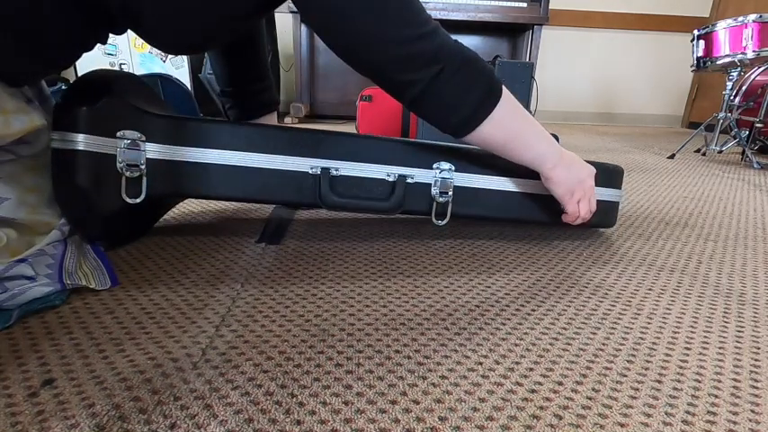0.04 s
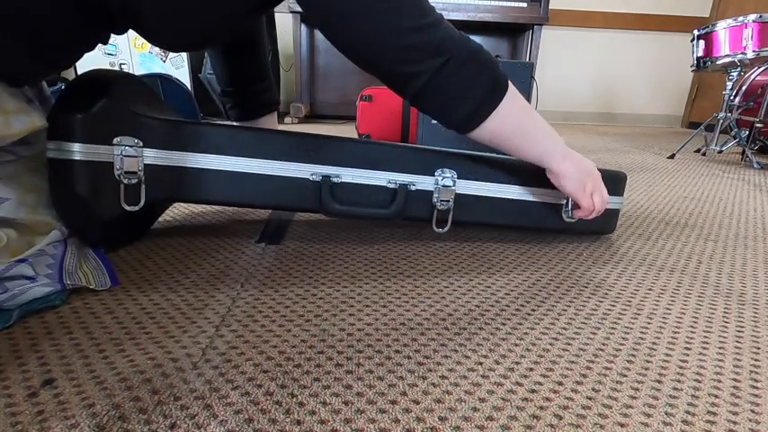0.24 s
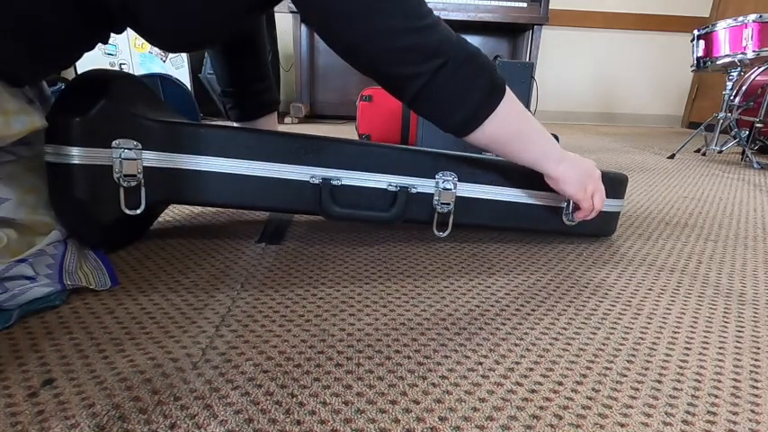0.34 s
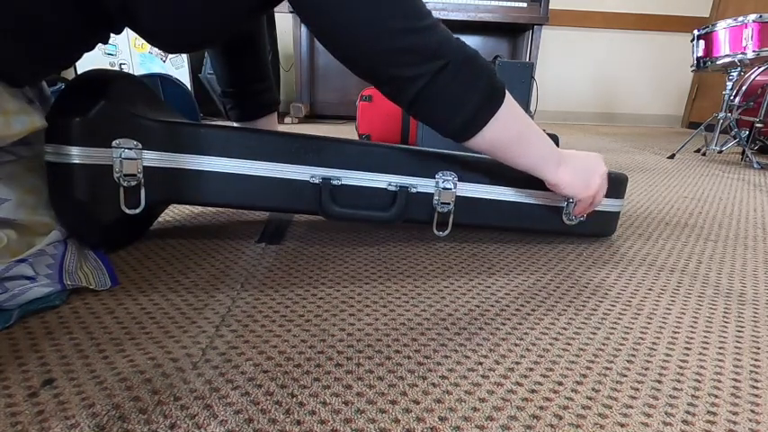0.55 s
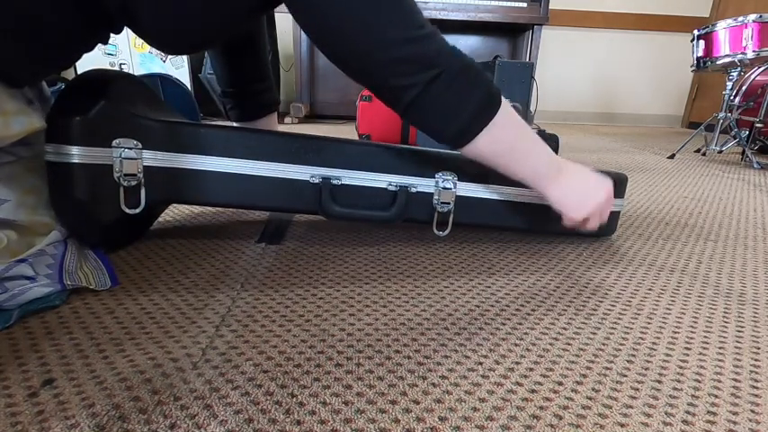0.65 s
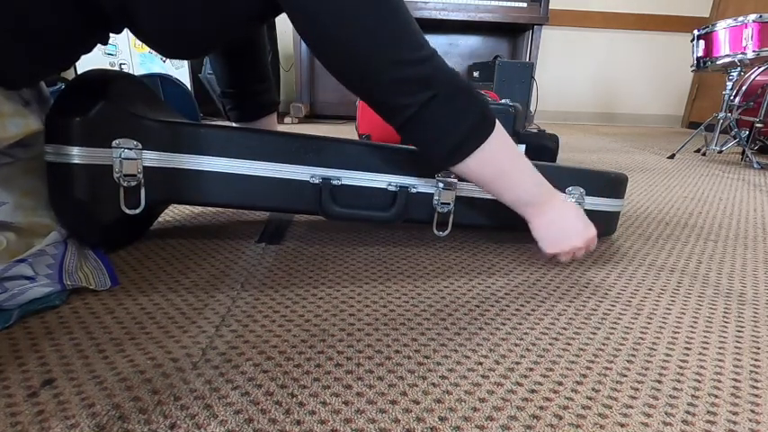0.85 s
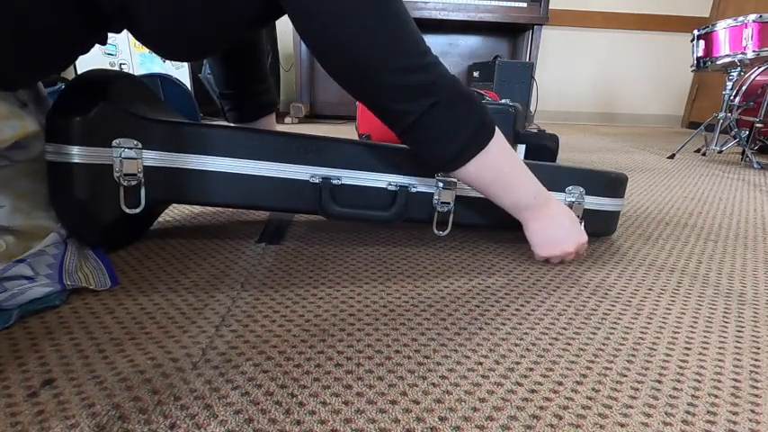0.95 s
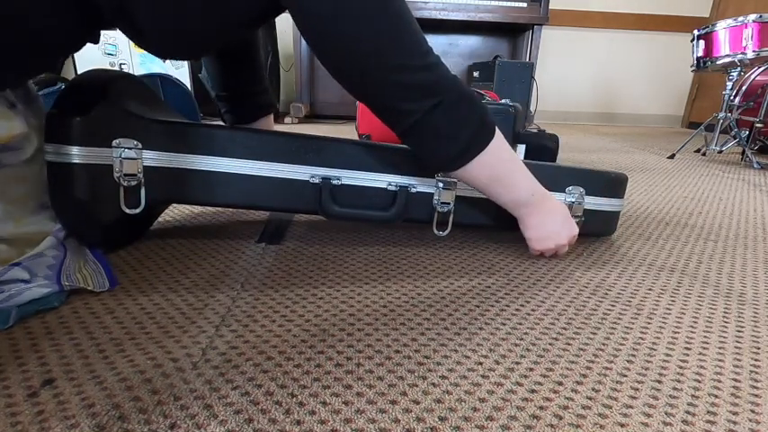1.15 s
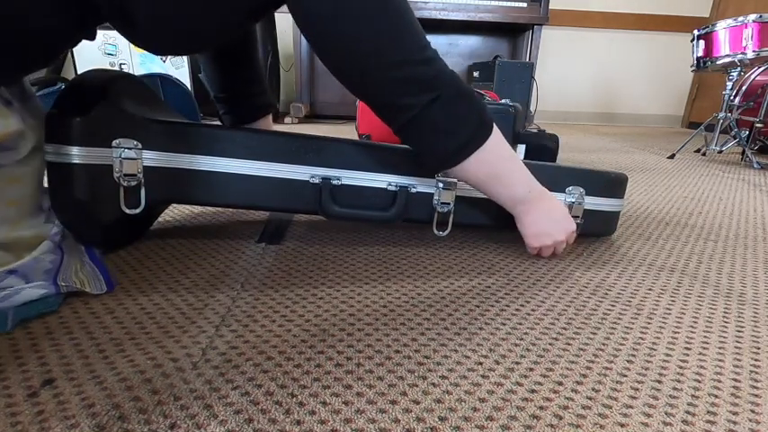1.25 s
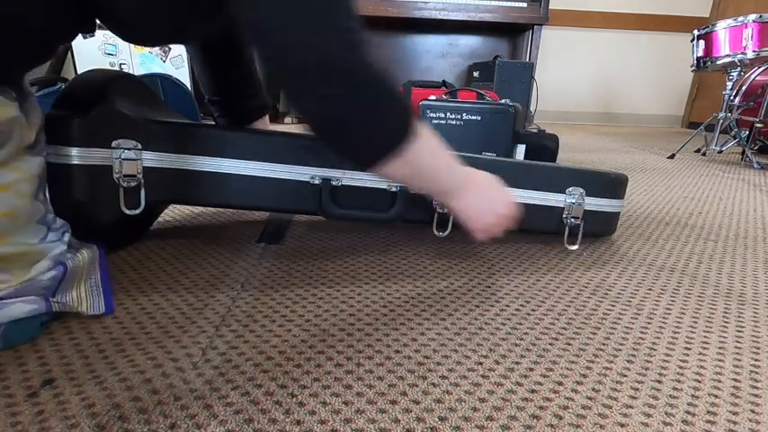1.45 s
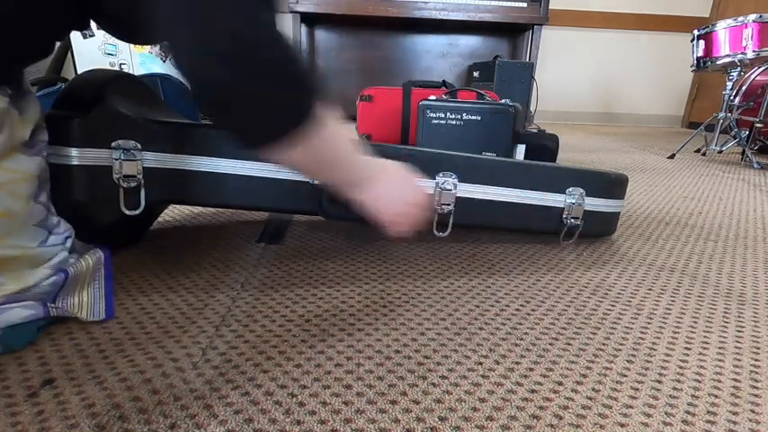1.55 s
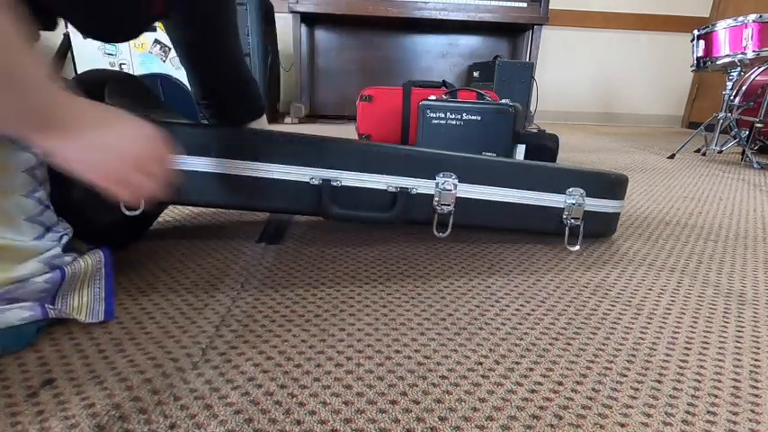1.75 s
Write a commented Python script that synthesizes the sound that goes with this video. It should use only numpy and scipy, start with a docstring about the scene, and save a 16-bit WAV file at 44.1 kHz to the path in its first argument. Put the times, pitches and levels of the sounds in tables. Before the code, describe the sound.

Close, slightly right of centre, a case latch pops with a boomy knock, small rattles follow, then a second, brighter and thinner snap and clack; soft sleeve rustle ends it, over low engine-like drone indoors.

```python
"""Latches of a hard case

A hand snaps open two metal latches of a long hard case that lies on the carpet of a small room.
Each contact excites damped modes of plastic shell, latch metal and hollow case, plus bursts of noise;
a weaker noise tail is the rattle of the loose hasps. A diffuse room tail follows.
Coloured noise gives the room tone and, late, a sleeve that brushes along as the arm moves.
Wavering harmonic and inharmonic sines form a low drone, like an engine outside, that slowly rises in pitch."""
import sys
import numpy as np
from scipy import signal
from scipy.fft import rfft, irfft
from scipy.io import wavfile
from scipy.ndimage import uniform_filter1d

SR = 44100
rng = np.random.default_rng(int(sys.argv[2]) if len(sys.argv) > 2 else 0)


def output_pcm(signal):
    """Save a mono or channel-first signal as 16-bit PCM at the path in sys.argv[1].

    Samples are clipped to [-1, 1] before scaling.
    """
    pcm = np.clip(np.atleast_2d(signal).T, -1, 1) * 32767
    wavfile.write(sys.argv[1], SR, np.round(pcm).astype(np.int16))


N = 79380
T = np.arange(N) / SR

# spectral shape of the room tone: [f/Hz, relative density/dB]
AIR_SPECTRUM = [(15, -38), (30, -10.5), (55, -4), (90, 4.5), (140, -14), (240, -13.5), (330, -23.5),
                (520, -38), (1000, -41.5), (1600, -44.5), (3900, -55.5), (6900, -55.5), (10300, -69.5),
                (15000, -70)]
# course of the drone: [t/s, fundamental f/Hz, level/dB]
DRONE_COURSE = [(0, 71.4, -34), (.06, 76.44, -41.5), (.13, 76.7, -41), (.22, 74.94, -43), (.35, 78.21, -52),
                (.44, 78, -33), (.53, 79.22, -47.5), (.67, 77.85, -35.5), (.76, 78.82, -35),
                (.85, 79.12, -42), (.9, 80.83, -61), (1.0, 79, -43.5), (1.13, 79.54, -32), (1.3, 80, -33.5),
                (1.49, 83.03, -33.5), (1.54, 83.77, -46.5), (1.62, 82.8, -30), (1.69, 84.5, -46),
                (1.8, 85.5, -49.5)]
# overtones of the drone: [multiple of the fundamental, level/dB relative to it]
DRONE_OVERTONES = [(2, -21.5), (3, -26)]
# level of a second, higher set of lines that swells late: [t/s, level/dB]
SWELL_COURSE = [(0, -47.5), (1.2, -57.5), (1.42, -43.5), (1.64, -43), (1.8, -51.5)]
# lines of that set: [multiple of the fundamental, level/dB relative to the swell]
SWELL_PARTIALS = [(1.4, -4.5), (2, -5), (2.53, -9.5)]
# course of the sleeve: [t/s, level/dB]
SLEEVE_COURSE = [(0, -110), (.9, -100), (1.12, -76.5), (1.25, -64), (1.38, -56.5), (1.5, -53), (1.64, -54),
                 (1.8, -56)]
# spectral shape of the rubbing cloth: [f/Hz, relative density/dB]
CLOTH_SPECTRUM = [(200, 7), (700, -4), (1600, 2.5), (2800, -2), (4500, -2.5), (8000, -11.5), (11000, -23.5),
                  (15000, -35)]
# bands of the diffuse room tail: [centre f/Hz, level/dB, reverberation time t60/s]
ROOM_BANDS = [(99.7, -14.5, 0.44), (320, -3.5, 0.3), (800, -10, 0.28), (1590, -10.5, 0.31),
              (3500, -9, 0.28), (7000, -12.5, 0.21), (14000, -10.5, 0.31)]
# right-to-left level difference of the case: [f/Hz, level/dB]
RIGHT_EXCESS = [(200, 0.4), (700, -0.5), (1300, 2), (2400, -0.3), (4400, 0.3), (8000, 2.5), (15000, 3.5)]
# air modes of the hollow case: [f/Hz, mean level/dB, t60/s], scattered at each contact
HOLLOW_MODES = [(76, -9.5, 0.21), (118.6, -4, 0.12), (165.2, -3, 0.097), (199.3, -5, .08),
                (237.8, -3, 0.075), (318.4, -8, 0.092), (469, -10.5, 0.047)]
# modes of the plastic shell: [f/Hz, mean level/dB, t60/s], scattered and favoured at each contact
SHELL_MODES = [(568, -3.5, 0.043), (711, -1, 0.052), (809, -5, 0.05), (995, -5, .035), (1224, -4.5, 0.051),
               (1488, -1.5, 0.019), (1656, -12.5, 0.019), (1940, -12.5, .02)]
# modes of the latch metal: [f/Hz, mean level/dB, t60/s], scattered at each contact
METAL_MODES = [(2250, 5, 0.021), (2735, 8, 0.018), (3096, 0, 0.022), (3304, -1, 0.065), (3730, -0.5, 0.036),
               (4202, 2.5, 0.02), (4580, -3, 0.041), (5490, -5.5, 0.02), (6660, -4.5, .02),
               (8570, -13.5, 0.06)]
# spectral shape of the noise of the shell, before a struck spot favours it: [f/Hz, relative density/dB]
KNOCK_SPECTRUM = [(200, -19), (450, -1.5), (720, 1), (1000, -1), (1300, 0), (1650, -4.5), (2100, -11.5),
                  (3000, -20), (8000, -51)]
# spectral shape of the noise of the latch metal: [f/Hz, relative density/dB]
CLICK_SPECTRUM = [(900, -13), (2000, -5), (3000, 2.5), (4500, -2.5), (6500, -8.5), (9500, -15.5),
                  (12000, -28), (16000, -37)]
# contacts of latch and case: [t/s, shell level/dB, metal level/dB, hollow level/dB,
# scrape decay constant/ms, f/Hz favoured by the struck spot]; the gains below add to the levels
CONTACT_EVENTS = [(0.226, -33, -49, -43, 12, 810), (0.2351, -18, -28, -11.5, 2, 926),
                  (0.2406, -12, -23.5, -14.5, 1.44, 1340), (0.262, -30.5, -36, -22.5, 10, 1500),
                  (0.283, -35, -48, -22, 16, 1810), (0.297, -32.5, -42, -32, 4.3, 910),
                  (0.315, -28.5, -53.5, -33, 7.5, 706), (0.3923, -32, -51.5, -58, 1.7, 735),
                  (0.5004, -33.5, -46.5, -40.5, 1.52, 1310), (0.542, -32.5, -52.5, -45.5, 4.2, 1300),
                  (0.5594, -32.5, -45, -47.5, 3.3, 807), (0.565, -40, -50, -54.5, 1.5, 1230),
                  (0.6071, -32.5, -51, -43.5, 7.5, 700), (0.641, -43, -76, -44.5, 3.6, 1080),
                  (0.711, -46, -82, -42, 10, 1135), (0.7802, -36.5, -65, -32.5, 4, 480),
                  (0.8128, -33, -55.5, -45.5, 2.3, 750), (0.826, -52, -74, -59, 5.5, 610),
                  (0.842, -41.5, -81, -40, 2.7, 603), (1.0505, -55.5, -71.5, -69, 0.81, 1960),
                  (1.182, -52, -72, -64, 2.3, 1200), (1.2247, -26.5, -40, -32.5, 2.5, 1200),
                  (1.2614, -13.5, -22.5, -33, 1.25, 1733), (1.377, -52, -65, -38.5, 2.16, 1400),
                  (1.3873, -24, -28, -28, 1.6, 1020), (1.3926, -26.5, -51.5, -39.5, 5.2, 980),
                  (1.418, -33.5, -45, -30, 6.45, 1190)]

AIR_DB = -46
ROOM_GAP_S, ROOM_WIDE_HZ = 0.0054, 2200
PORT_LAG_S = 0.000042
# gains of the ringing and noisy parts of each contact
SHELL_DB, KNOCK_DB, METAL_DB, CLICK_DB, HOLLOW_DB = -9, -7, -3.5, -4, -1
CHATTER_DB, CHATTER_S = -9.5, 0.009  # brief rattle of the loose hasps
PEAK_S, RING_S = 0.003, 0.4  # averaging window for peak level, length of a contact
SPOT_DB, SPOT_OCTAVES = 9, 0.59  # height and width of the favoured band
RISE_SHARE = 0.2  # rise constant as a share of the decay constant
CLICK_WIDTH, KNOCK_WIDTH = 0.55, 0.22  # side-to-mid amplitude ratios
TOP_HZ = 15700


def undb(db):
    """A level in decibels is 20 times the logarithm of an amplitude ratio; return the ratio."""
    return 10 ** (np.asarray(db) / 20)


def curve(rows, column=1):
    """Linear interpolation: a table column becomes a continuous function of time."""
    rows = np.array(rows)
    return np.interp(T, rows[:, 0], rows[:, column])


def unit(x):
    """Normalisation of mean power: the rms becomes 1."""
    return x / np.sqrt(np.mean(x ** 2))


def unit_peak(x):
    """Normalisation of short-time power: the loudest few milliseconds get rms 1."""
    power = uniform_filter1d(x ** 2, int(PEAK_S * SR), mode="constant")
    return x / np.sqrt(power.max())


def colour(x, points):
    """Minimum-phase filtering: folding the cepstrum of a magnitude outline makes its response causal."""
    n, points = len(x), np.array(points)
    hz = np.maximum(np.fft.rfftfreq(n, 1 / SR), 1)
    outline_db = np.interp(np.log(hz), np.log(points[:, 0]), points[:, 1])
    cepstrum = irfft(np.log(undb(outline_db)), n)
    cepstrum[1:n // 2] *= 2
    cepstrum[n // 2 + 1:] = 0
    return irfft(rfft(x) * np.exp(rfft(cepstrum)), n)


def wide_noise(n, wide_hz):
    """Diffuse-field coherence: both sides agree in the bass and become unrelated in the treble."""
    hz = np.fft.rfftfreq(n, 1 / SR)
    mid, side = rfft(rng.standard_normal((2, n)))
    width = hz / np.hypot(hz, wide_hz)
    sides = mid + np.array([[1], [-1]]) * width * side
    return irfft(sides / np.sqrt(1 + width ** 2), n)


def hiss(points, wide_hz):
    """Broadband random pressure: stereo noise with a given spectral shape and rms 1."""
    return unit(np.array([colour(side, points) for side in wide_noise(N, wide_hz)]))


def waver(rate_hz, depth):
    """Random amplitude modulation: noise smoothed twice makes a gain that wanders around 1."""
    k = int(SR / rate_hz)
    smooth = uniform_filter1d(uniform_filter1d(rng.standard_normal(N), k), k)
    return 1 + depth * unit(smooth)


def room_tone():
    """Stationary background noise: steady random pressure, strongest in the bass."""
    return undb(AIR_DB) * hiss(AIR_SPECTRUM, wide_hz=1500)


def wavering_lines(rows, phase):
    """Superposition of sines tied to one phase, each with its own random amplitude modulation."""
    total = 0
    for multiple, db in rows:
        total = total + undb(db) * np.sin(multiple * phase) * waver(rate_hz=7.8, depth=0.51)
    return total


def drone():
    """Engine-like line spectrum: all lines follow one moving fundamental, the higher set swelling late."""
    phase = 2 * np.pi * np.cumsum(curve(DRONE_COURSE)) / SR
    main = np.sin(phase) * waver(rate_hz=9.6, depth=0.05)
    main = main + wavering_lines(DRONE_OVERTONES, phase)
    swell = wavering_lines(SWELL_PARTIALS, phase)
    # sqrt(2) makes the rms of a sine 1
    return np.sqrt(2) * (undb(curve(DRONE_COURSE, 2)) * main + undb(curve(SWELL_COURSE)) * swell)


def sleeve():
    """Friction noise: cloth slides softly as the arm swings back, heard as modulated coloured noise."""
    cloth = hiss(CLOTH_SPECTRUM, wide_hz=2000)
    return cloth * undb(curve(SLEEVE_COURSE)) * waver(rate_hz=68, depth=0.061)


def room(x):
    """Diffuse reverberation: convolution with noise that decays exponentially at each band's own rate."""
    t = T[:SR // 2]
    hz, db, t60 = np.array(ROOM_BANDS).T
    noise = rfft(wide_noise(len(t), ROOM_WIDE_HZ))
    log_hz = np.log(np.maximum(np.fft.rfftfreq(len(t), 1 / SR), 1))
    onset = np.clip(t / ROOM_GAP_S - 1, 0, 1)  # silent for one gap, full after two
    tail = 0
    for share, band_db, band_t60 in zip(np.eye(len(hz)), db, t60):
        fade = np.exp(-np.log(1000) * t / band_t60) * onset
        band = irfft(noise * np.interp(log_hz, np.log(hz), share), len(t))
        tail = tail + undb(band_db) * band * fade / np.linalg.norm(fade)
    return signal.fftconvolve(x.mean(0)[None], tail, axes=1)[:, :N]


def ports(x):
    """Interaural-type differences: the right microphone port, nearer, hears earlier and mostly louder."""
    hz, excess = np.fft.rfftfreq(2 * N, 1 / SR), np.array(RIGHT_EXCESS)
    half_db = np.interp(hz, excess[:, 0], excess[:, 1]) / 2
    half_lead = np.exp(1j * np.pi * hz * PORT_LAG_S)
    tilt = undb(half_db) * half_lead
    return irfft(rfft(x, 2 * N) * np.array([1 / tilt, tilt]))[:, :N]


def favour(rows, spot_hz):
    """Position-dependent excitation: levels rise around the frequency that the struck spot favours."""
    rows = np.array(rows, float)
    octaves = np.log2(rows[:, 0] / spot_hz)
    rows[:, 1] += SPOT_DB * np.exp(-0.5 * (octaves / SPOT_OCTAVES) ** 2)
    return rows


def ring(modes, t, scatter_db, detune):
    """Modal superposition: exponentially damped sines, struck a little differently each time."""
    hz, db, t60 = np.array(modes).T[:, :, None]
    size, shift = rng.standard_normal((2, len(modes), 1))
    sign = (-1) ** np.arange(len(modes))[:, None]
    damping = np.exp(-np.log(1000) * t / t60)
    waves = np.sin(2 * np.pi * hz * (1 + detune * shift) * t) * damping
    return unit_peak((sign * undb(db + scatter_db * size) * waves).sum(0))


def crack(points, t, decay_s, width):
    """Stochastic excitation: scraping parts make a decaying noise burst, partly alike on both sides."""
    decay = np.exp(-t / decay_s) + undb(CHATTER_DB) * np.exp(-t / CHATTER_S)
    fade = decay * (1 - np.exp(-t / (RISE_SHARE * decay_s)))
    mid, side = (unit_peak(colour(rng.standard_normal(len(t)) * fade, points)) for _ in range(2))
    return mid + np.array([[1], [-1]]) * width * side


def latches():
    """Impact excitation: every contact sounds the shell, the latch metal and the hollow of the case."""
    t = np.arange(int(RING_S * SR)) / SR
    out = np.zeros((2, N + len(t)))
    for start, shell_db, metal_db, bump_db, scrape_ms, spot_hz in CONTACT_EVENTS:
        decay_s = scrape_ms / 1000
        shell = undb(SHELL_DB) * ring(favour(SHELL_MODES, spot_hz), t, scatter_db=0.5, detune=0.012)
        knock = undb(KNOCK_DB) * crack(favour(KNOCK_SPECTRUM, spot_hz), t, decay_s, KNOCK_WIDTH)
        metal = undb(METAL_DB) * ring(METAL_MODES, t, scatter_db=7, detune=0.0065)
        click = undb(CLICK_DB) * crack(CLICK_SPECTRUM, t, decay_s, CLICK_WIDTH)
        bump = undb(HOLLOW_DB) * ring(HOLLOW_MODES, t, scatter_db=5, detune=0.013)
        contact = undb(shell_db) * (shell + knock) + undb(metal_db) * (metal + click)
        i = int(start * SR)
        out[:, i:i + len(t)] += contact + undb(bump_db) * bump
    return out[:, :N]


def scene():
    """Linear superposition: the case and its room, slightly to the right, over the other sounds."""
    case = latches()
    return room_tone() + drone() + sleeve() + ports(case + room(case))


def record(dry):
    """Band limitation: the recorder's steep elliptic low-pass removes the top of the spectrum."""
    low_pass = signal.ellip(8, 0.2, 70, TOP_HZ, fs=SR, output="sos")
    return signal.sosfilt(low_pass, dry)


dry = scene()
out = record(dry)
output_pcm(out)
```